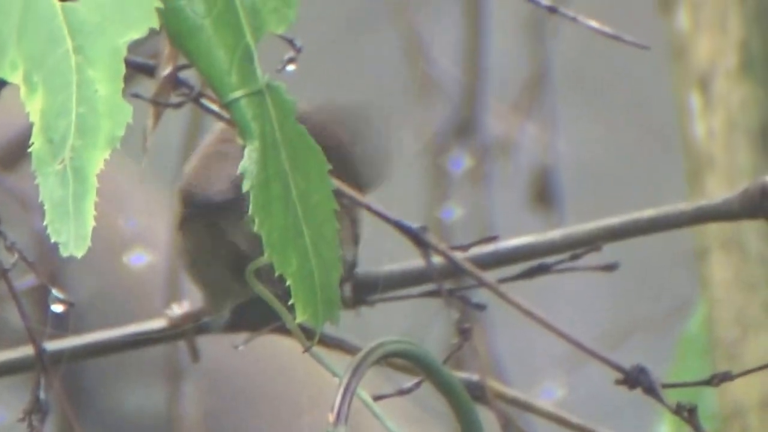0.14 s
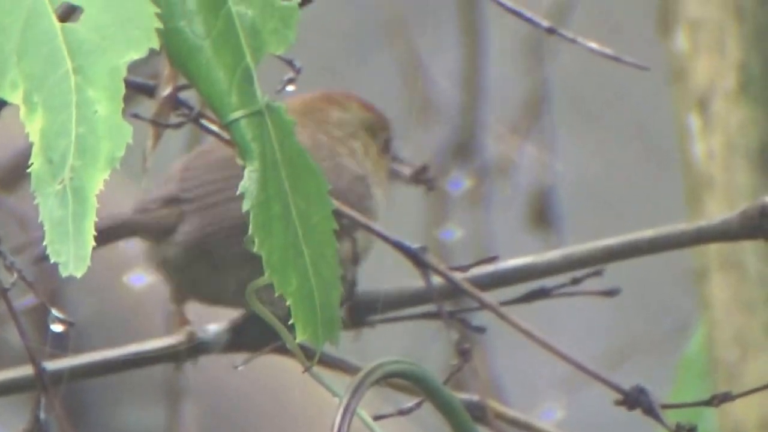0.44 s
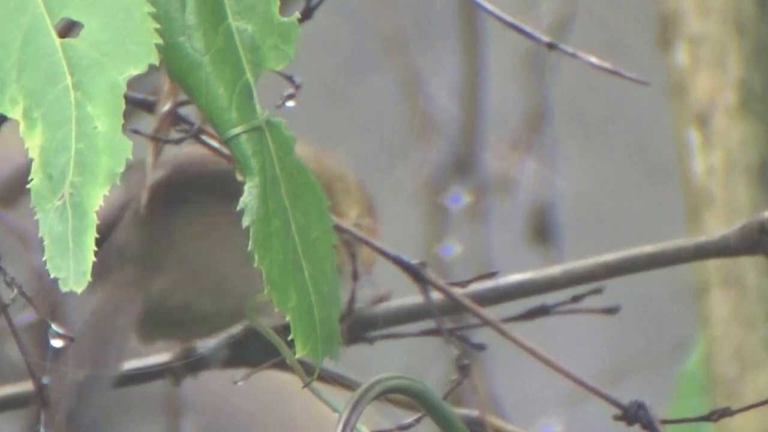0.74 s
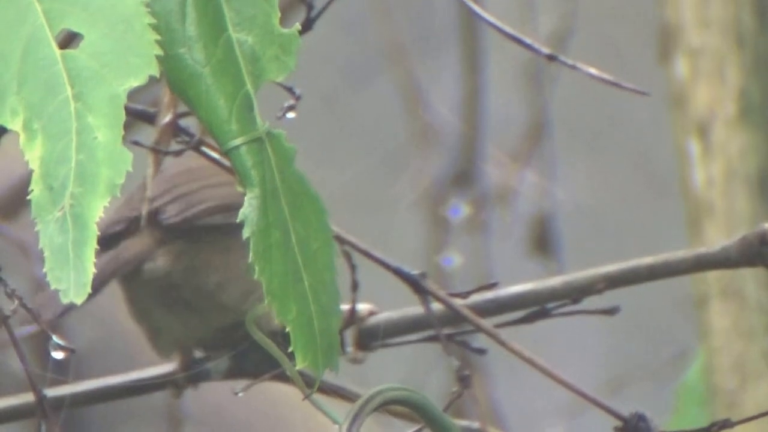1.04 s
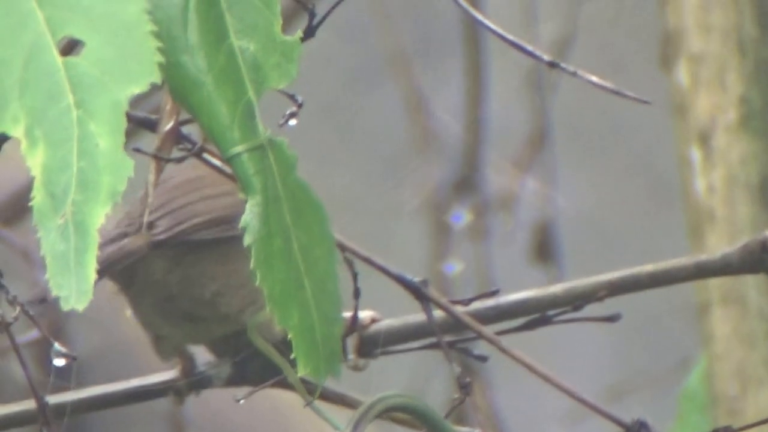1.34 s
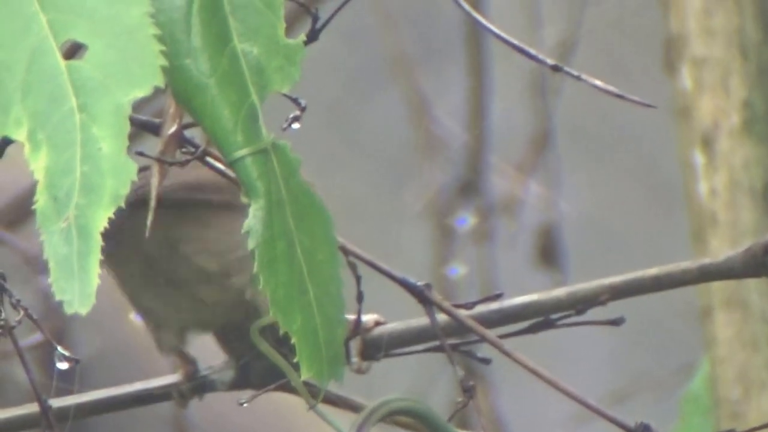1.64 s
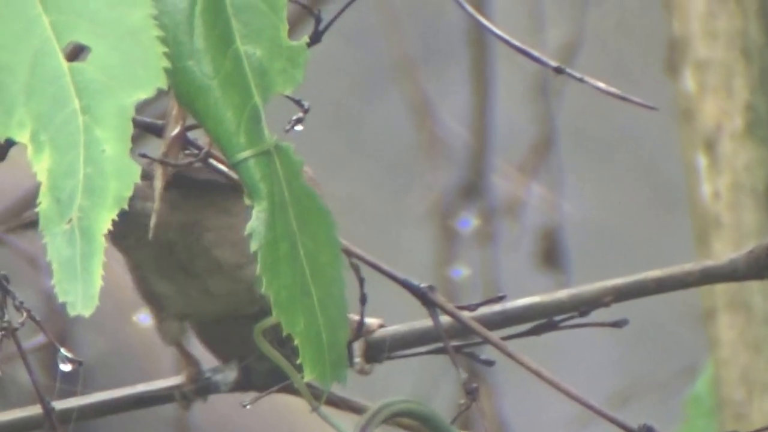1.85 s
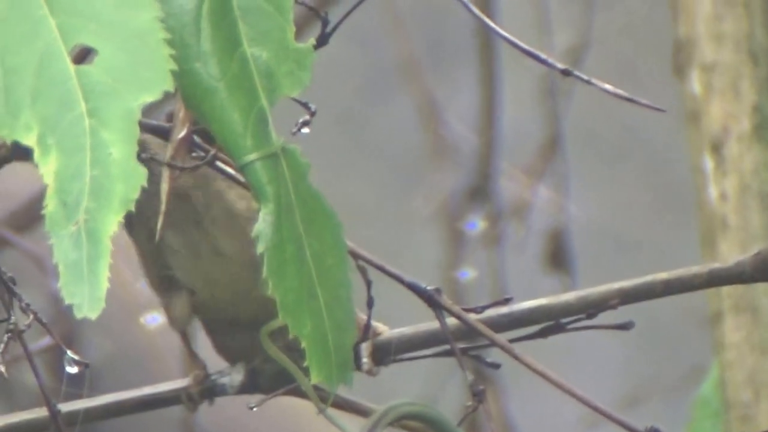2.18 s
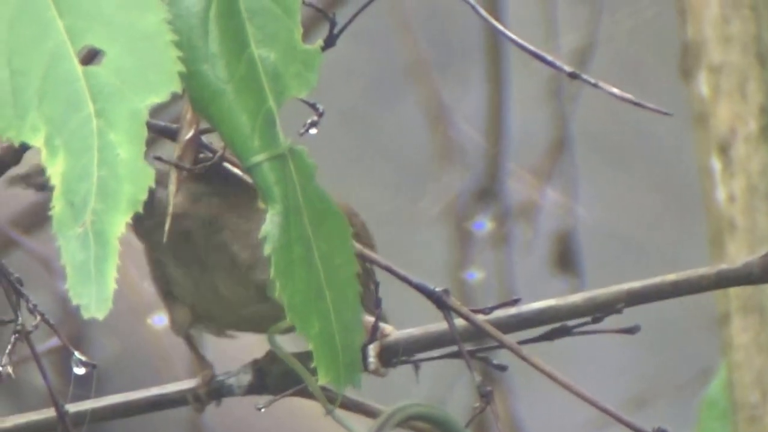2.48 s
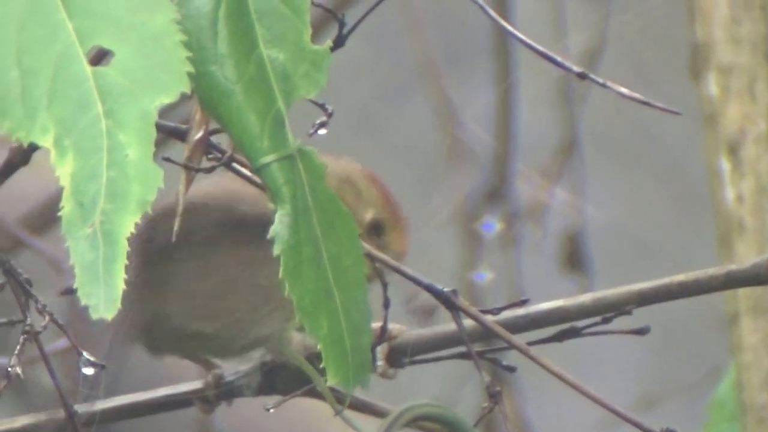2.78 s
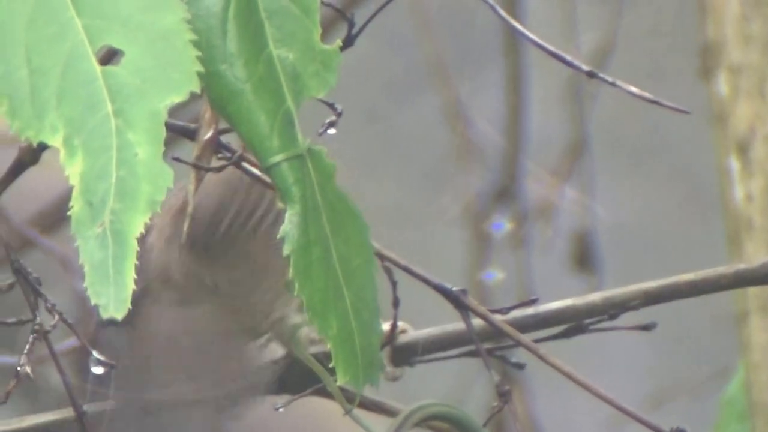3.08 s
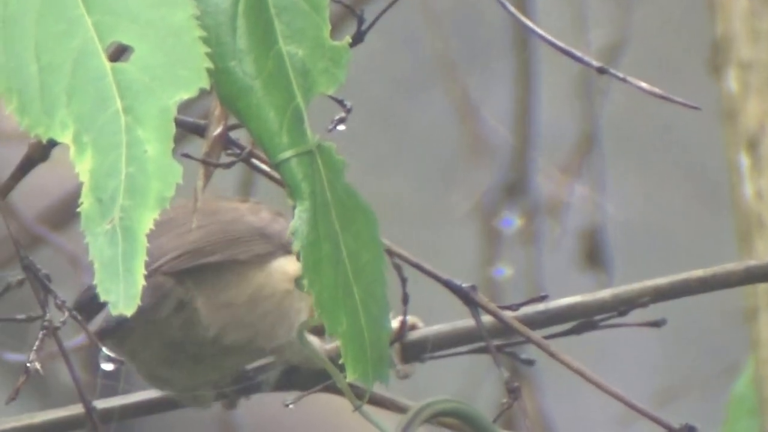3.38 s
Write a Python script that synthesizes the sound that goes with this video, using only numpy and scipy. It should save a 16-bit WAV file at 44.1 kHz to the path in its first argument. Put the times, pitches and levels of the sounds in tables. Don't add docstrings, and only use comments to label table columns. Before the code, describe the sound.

A small bird whistles level notes, then another bird buzzes harshly among dripping leaves

```python
import sys
import numpy as np
from scipy import signal
from scipy.fft import rfft, irfft
from scipy.io import wavfile
from scipy.ndimage import uniform_filter1d

SR = 44100
rng = np.random.default_rng(int(sys.argv[2]) if len(sys.argv) > 2 else 0)


def to_linear_factor(level_db):
    exponent = np.asarray(level_db, float) / 20
    return 10 ** exponent


def int16_out(signal):
    q = np.round(np.clip(np.atleast_2d(signal).T, -1, 1) * 32767)
    wavfile.write(sys.argv[1], SR, q.astype(np.int16))


N = 155232
T = np.arange(N) / SR


def at(table, hz):
    points_hz, db = np.array(table).T
    return np.interp(np.log(hz + 1), np.log(points_hz), db)


def unit(x):
    return x / np.sqrt(np.mean(x ** 2))


def colour(x, db_of_hz):
    return irfft(rfft(x) * to_linear_factor(db_of_hz(np.fft.rfftfreq(N, 1 / SR))), N)


def noise():
    return rng.standard_normal(N)


def walk(rate_hz):
    k = int(SR / rate_hz)
    steps = np.repeat(rng.standard_normal(N // k + 1), k)
    return unit(uniform_filter1d(uniform_filter1d(steps, k), k)[:N])


def swell(start, length, edge, attack=None):
    rise = (T - start) / (attack or edge)
    fall = (start + length - T) / edge
    return np.sin(np.pi / 2 * np.clip(np.minimum(rise, fall), 0, 1)) ** 2


def band(x, centre_hz, width_hz):
    low = signal.sosfilt(signal.butter(4, width_hz / 2, fs=SR, output="sos"), x, axis=1)
    phase = 2 * np.pi * np.cumsum(centre_hz + 0 * T) / SR
    return unit(low[0] * np.cos(phase) + low[1] * np.sin(phase))


def place(x, pan_db, wet_db, t60=0.88):
    t = T[:SR]
    build_up = np.clip(t / 0.0063, 0, 1)
    mid, side = rng.standard_normal((2, SR)) * to_linear_factor(-60 * t / t60) * build_up
    side = to_linear_factor(-19.5) * side
    tail = np.array([mid + side, mid - side]) / np.sqrt(np.sum(mid ** 2))
    wet = signal.fftconvolve(x[None], tail, axes=1)[:, :N]
    return (x + to_linear_factor(wet_db) * wet) * to_linear_factor(np.array([[pan_db], [-pan_db]]) / 2)


def glides(rows, settle_s, waver_hz, flutter_db=0):
    out, waver = np.zeros(N), waver_hz * walk(120)
    for s, length, hz0, hz1, db in rows:
        u = np.clip(T - s, 0, length)
        progress = (1 - np.exp(-u / settle_s)) / (1 - np.exp(-length / settle_s))
        hz = hz0 + (hz1 - hz0) * progress + waver
        tone = np.sin(2 * np.pi * np.cumsum(hz) / SR)
        out += np.sqrt(2) * to_linear_factor(db) * swell(s, length, min(0.081 * length, .015)) * tone
    return out * to_linear_factor(flutter_db * walk(50))


# (frequency [Hz], level per Hz [dB])
HUM = [(20, -21), (45, -9), (70, 0.5), (150, -2.5), (250, -4.5), (310, -11), (400, -5.5), (600, -23)]
AIR = [(600, 1), (1000, -3.5), (1500, -1.5), (2200, -6), (5800, -7), (8000, -11), (16000, -17.5)]
# (time [s], level [dB])
HUM_SWELL = [(0, 3.5), (.9, 3.5), (1.6, 0.5), (3.52, 0)]
# (frequency [Hz], bandwidth [Hz], level [dB])
DRONES = [(797, 55, -75), (896, 61, -73), (1281, 60, -74.5), (1474, 80, -73)]


def bed():
    hum = unit(colour(noise(), lambda hz: at(HUM, hz) - 60 * (hz > 620)))
    upper = colour(hum, lambda hz: -60. * (hz < 180))
    upper_gain = to_linear_factor(np.interp(T, *np.array(HUM_SWELL).T))
    out = to_linear_factor(-53.5 + .8 * walk(4.3)) * (hum + upper * (upper_gain - 1))
    air = unit(colour(noise(), lambda hz: at(AIR, hz) - 60 * (hz < 620)))
    out += air * to_linear_factor(-60 + .5 * walk(4.7))
    for hz, width_hz, db in DRONES:
        out += to_linear_factor(db + 1.5 * walk(1.16)) * band(rng.standard_normal((2, N)), hz, width_hz)
    return out


# (frequency [Hz], left minus right [dB])
LEAN = [(90, 1.2), (200, -2.2), (380, -6.8), (560, -1.6), (1100, -1.4), (1700, 0)]
# (frequency [Hz], level [dB])
APART = [(60, -29), (400, -17), (900, -12.5), (1300, -15), (1700, -39), (5000, -44), (6000, -10),
         (8000, -10), (10000, -18)]


def background():
    mid = bed()
    side = colour(bed(), lambda hz: at(APART, hz))
    return np.array([colour(mid + way * side, lambda hz: way * at(LEAN, hz) / 2) for way in (1, -1)])


# (time [s], length [s], centre [Hz], level [dB])
CHATTER = [(.025, .17, 3200, -65), (.09, .18, 6270, -67), (.173, .053, 4200, -65), (.24, .24, 5700, -69),
           (.431, .031, 3140, -66), (.579, .07, 3370, -65), (.588, .068, 5100, -63), (.69, .035, 2800, -69),
           (1.032, .04, 2850, -69), (1.117, .034, 3600, -65), (1.119, .039, 5500, -63),
           (1.36, .12, 6900, -69), (1.594, .03, 3300, -66), (1.742, .12, 3024, -63), (1.83, .2, 4700, -65),
           (2.4, .25, 3100, -68), (2.492, .065, 3380, -61), (2.574, .012, 2700, -62),
           (3.157, .3, 7400, -65), (3.36, .045, 2500, -62)]


def chatter():
    grain, out = rng.standard_normal((2, N)), np.zeros(N)
    for s, length, hz, db in CHATTER:
        patch = swell(s - .005, length, min(0.084 * length, .04))
        out += to_linear_factor(db) * patch * band(grain, hz, .18 * hz)
    return place(out, 0.23, -5)


# (frequency [Hz], level [dB])
TAP_MODES = [(1500, -40.5), (3150, -42.5), (3900, -44.5), (4900, -50), (5900, -46.5)]


def tap():
    start_s, t60_s, attack_s = .049, 0.02, 0.00046
    u, out = np.maximum(T - start_s, 0), np.zeros(N)
    for hz, db in TAP_MODES:
        out += to_linear_factor(db - 60 * u / t60_s) * np.clip(u / attack_s, 0, 1) * np.sin(2 * np.pi * hz * u)
    return out


# (time [s], level [dB], spatter [s], tail T60 [s], leaf body [dB])
DRIPS = [
    (0.689, -50, 0.019, 0.25, -9),
    (1.033, -66.5, 0.0032, 0.11, 4.5),
    (1.273, -51, 0.036, 0.33, -8),
    (1.627, -50, 0.042, 0.3, -11.5),
    (1.907, -68, 0.0046, 0.083, -13),
    (2.283, -53.5, 0.0048, 0.36, -8),
    (2.533, -49, 0.029, 0.39, -8),
]
# (frequency [Hz], level [dB])
SPLASH = [(4000, -49), (6500, -10), (8900, -6.5), (13000, 2.5), (14800, -0.5), (15750, -1.5), (16500, -31)]
LEAF = [(2500, -24), (3900, -11), (4800, -3.5), (6150, -0.5), (7000, -6.5), (9000, -40)]


def drips():
    splash = unit(colour(noise(), lambda hz: at(SPLASH, hz))) * to_linear_factor(1.3 * walk(250))
    leaf = unit(colour(noise(), lambda hz: at(LEAF, hz))) * to_linear_factor(1.3 * walk(120))
    out = tap()
    for s, db, hold, t60, body_db in DRIPS:
        decay_db = -60 * np.maximum(T - s - hold, 0) / t60
        snap_db = 2.5 * np.exp(-np.abs(T - s) / .03)
        fade = np.clip((T - s) / .0015, 0, 1) * to_linear_factor(db + decay_db + snap_db)
        out += fade * (splash + to_linear_factor(body_db + 2.5 + decay_db) * leaf)
    return place(out, 2, -13.5)


# (time [s], length [s], start [Hz], end [Hz], level [dB])
LEAD_INS = [
    (.145, 0.0245, 2520, 2090, -59.5),
    (.474, 0.03, 2320, 2070, -59),
    (.652, 0.034, 2134, 2143, -55.5),
    (.668, .02, 2330, 2110, -60),
]


def lead_ins():
    return glides(LEAD_INS, .02, 5)


WHISTLE_EDGE_S = 0.022
# (time [s], length [s], pitch [Hz], level [dB], swell across note [dB])
WHISTLES = [(0.164, 0.021, 2070, -48, 4), (0.18, 0.046, 2022, -45.5, -12), (0.216, 0.036, 2060, -44.5, -4),
            (0.236, 0.038, 2070, -38.5, 2), (0.266, 0.017, 2060, -39.5, -5), (0.277, 0.027, 2078, -46, -7),
            (0.3, 0.029, 2055, -46, -7), (0.496, 0.076, 2106, -36.5, 2.5), (0.683, .080, 2109, -36.5, 0.1),
            (0.83, .115, 2102, -38, -1.5), (0.994, 0.09, 2088, -38, 8), (1.133, 0.11, 2083, -37.5, 1)]


def whistles():
    rise_hz_per_s, bow_hz, settled_s = 30, 22.6, 0.066
    out = np.zeros(N)
    for s, length, hz, db, grow_db in WHISTLES:
        u = T - s - length / 2
        bow = bow_hz * 4 * u ** 3 / (3 * length ** 2)
        tone = np.sin(2 * np.pi * (hz * u + rise_hz_per_s * u ** 2 / 2 + bow))
        edge = min(WHISTLE_EDGE_S, length / 2)
        level = to_linear_factor(db + grow_db * np.clip(u / length, -.5, .5))
        out += np.sqrt(2) * level * swell(s, length, edge, max(edge, length - settled_s)) * tone
    return out


# (time [s], length [s], level [dB])
RETURNS = [(0.325, 0.058, -54), (0.38, 0.013, -59), (.393, 0.018, -56), (0.412, .026, -58),
           (0.426, 0.039, -65), (0.564, 0.055, -41.5), (0.607, 0.033, -45), (0.752, 0.07, -41.5),
           (0.934, 0.039, -42.5), (0.961, 0.043, -42.5), (1.067, 0.046, -41), (1.099, 0.053, -45),
           (1.229, 0.053, -45), (1.271, 0.025, -43.5), (1.294, .03, -49), (1.319, 0.061, -56),
           (1.398, 0.12, -65), (1.51, 0.1, -66.5)]


def trunk_echoes():
    out = np.zeros(N)
    for s, length, db in RETURNS:
        latest_hz = [row[2] for row in WHISTLES if row[0] < s][-1]
        tone = np.sin(2 * np.pi * (latest_hz + 5.6) * T)
        out += np.sqrt(2) * to_linear_factor(db) * swell(s, length, min(WHISTLE_EDGE_S, length / 2)) * tone
    return out


# (time [s], level [dB], centre [Hz])
RASP = [
    (.67, -71, 7530),
    (0.721, -58.5, 7530),
    (0.852, -53.5, 7600),
    (0.93, -57, 7970),
    (1.02, -65.5, 7550),
    (1.15, -77, 7250),
]


def insect():
    t, db, hz = np.array(RASP).T
    rough_noise = rng.standard_normal((2, N)) * (0.7 + (rng.random(N) < 1100 / SR) * 0.74)
    centre_hz = np.interp(T, t, hz)
    rasp = band(rough_noise, centre_hz, 900) + to_linear_factor(-2.5) * band(rough_noise[::-1], 0.94 * centre_hz, 2100)
    return place(rasp * to_linear_factor(np.interp(T, t, db, left=-120, right=-120)), 2, -14.0)


# (time [s], level [dB], centre [Hz])
TRILL = [(1.81, -54, 6080), (1.84, -53.5, 6325), (1.97, -43.5, 6026), (2.09, -47, 6030),
         (2.26, -40.5, 5946), (2.31, -50.5, 5880), (2.42, -37, 5894), (2.55, -52.5, 5840),
         (2.58, -40, 5977), (2.71, -44, 5696), (2.78, -53, 5730), (2.81, -38.5, 5924), (2.94, -46, 5772),
         (3.02, -48, 5740), (3.15, -39, 5924), (3.28, -44.5, 5890), (3.40, -38, 5680), (3.52, -74, 5720)]


def triller():
    rate_hz, jitter, down_hz, up_hz = 128, .25, 1698, 332.7
    t, db, hz = np.array(TRILL).T
    turns = np.cumsum(rate_hz * (1 + jitter * walk(60))) / SR
    u = turns % 1
    size = rng.standard_normal(N // 100)[turns.astype(int)]
    pitch = np.interp(T, t, hz) + up_hz - (up_hz + down_hz) * (1 - u) ** 2 + 60 * size
    puff = u ** 1.3 * np.clip((1 - u) / 0.53, 0, 1) * to_linear_factor(1.5 * size)
    voice = unit(puff * np.sin(2 * np.pi * np.cumsum(pitch) / SR))
    for centre_hz, width_hz, side_db in ((4200, 700, -18.5), (5065, 600, -14),
                                         (7850, 600, -27), (12100, 1300, -28)):
        side_band = band(rng.standard_normal((2, N)), centre_hz, width_hz)
        voice = voice + to_linear_factor(side_db + 1.5 * walk(5.5)) * side_band
    effort = to_linear_factor(np.interp(T, t, db, left=-120, right=-120) - 6.0)
    return place(voice * effort, 1.6, 3.5)


# (time [s], length [s], start [Hz], end [Hz], level [dB])
FAR_SONG = [(2.292, .09, 3200, 3380, -59), (2.328, .055, 2800, 2800, -55.5), (2.39, .1, 2780, 2760, -61),
            (2.6, .06, 3900, 3850, -64), (2.64, .14, 3550, 3260, -53), (2.77, .1, 3900, 3880, -64),
            (2.8, .095, 3197, 3020, -53.5), (2.91, .062, 2899, 2732, -54), (2.91, .049, 3050, 3060, -56),
            (3.058, .072, 3737, 3370, -51.5), (3.135, .035, 2760, 2740, -58), (3.175, .1, 2690, 2640, -54),
            (3.495, .026, 4200, 4360, -57)]
FAR_SWEEPS = [
    (2.97, 0.053, 2957, 3255, -56),
    (3.30, 0.04, 2810, 3330, -50.5),
    (3.335, .06, 3263, 2182, -52.5),
    (3.345, 0.055, 3250, 3210, -54),
]


def far_song():
    song = glides(FAR_SONG, .02, 25, 4.3) + glides(FAR_SWEEPS, 0.1154, 25, 3.8)
    roughness = .22
    return place(song * (1 - roughness + roughness * walk(400)), 1.6, -2.5, .8)


# (time [s], length [s], start [Hz], end [Hz], level [dB])
SLIDE = [
    (2.943, 0.039, 5150, 5800, -41),
]
# (time [s], peak level [dB], pitch [Hz])
STROKES = [(2.9848, -21, 5630), (2.9924, -25, 5560), (2.9964, -32, 5700), (3.003, -30, 5460),
           (3.01, -29, 5580), (3.02, -31, 5680), (3.03, -28, 5580), (3.034, -32, 6000), (3.042, -28, 5870),
           (3.0464, -32, 6120), (3.0504, -25, 6240), (3.0596, -32, 5400), (3.078, -34, 5770),
           (3.0894, -32, 5770), (3.0974, -32, 5970), (3.1034, -34, 6100), (3.132, -31, 5700),
           (3.1527, -22, 5800), (3.1607, -23, 6110), (3.199, -30, 6070), (3.2134, -29, 6030),
           (3.236, -30, 6050), (3.3064, -29, 5940), (3.3494, -29, 5950), (3.3658, -29, 5820)]


def strokes():
    length_s, rise_hz_per_s = .006, 30000
    out = glides(SLIDE, .1, 45, 2.5)
    for s, db, hz in STROKES:
        u = T - s - length_s / 2
        tone = np.sin(2 * np.pi * (hz * u + rise_hz_per_s * u ** 2 / 2))
        out += to_linear_factor(db - 7) * swell(s - .001, length_s, length_s / 2) * tone
    return place(out, 1.6, -5)


def scene():
    whistler = place(lead_ins() + whistles() + trunk_echoes(), 3.5, -19.5, 1.9)
    return background() + chatter() + drips() + whistler + insect() + triller() + far_song() + strokes()


def top_cut(x):
    return signal.sosfilt(signal.butter(12, 16460, fs=SR, output="sos"), x)


def record(dry):
    mid = colour(dry.mean(axis=0), lambda hz: -80. * (hz > 15900))
    side = colour((dry[0] - dry[1]) / 2, lambda hz: -80. * (hz > 11000))
    return top_cut(np.array([mid + side, mid - side]))


dry = scene()
out = record(dry)
int16_out(out)
```